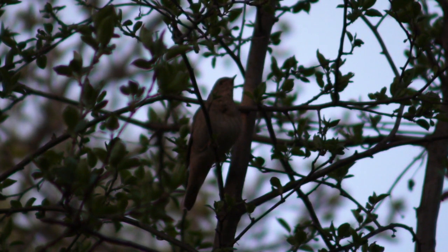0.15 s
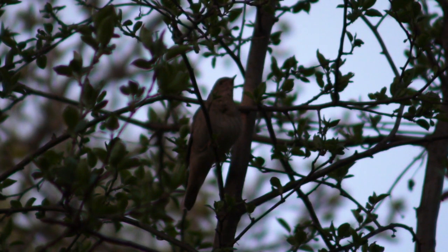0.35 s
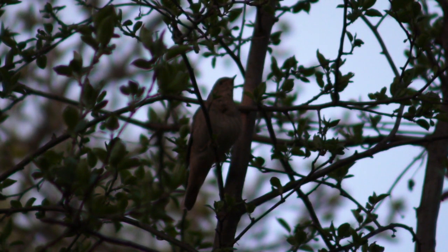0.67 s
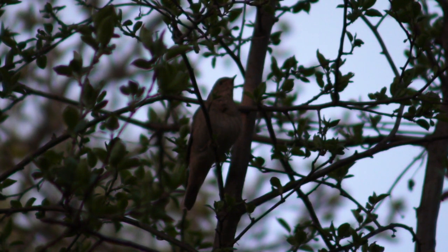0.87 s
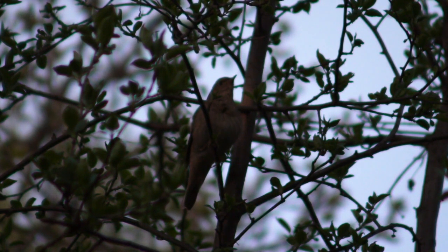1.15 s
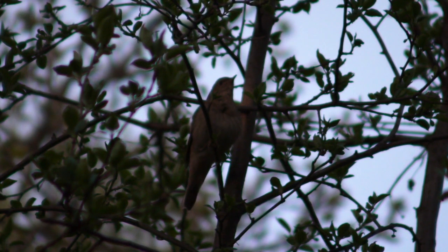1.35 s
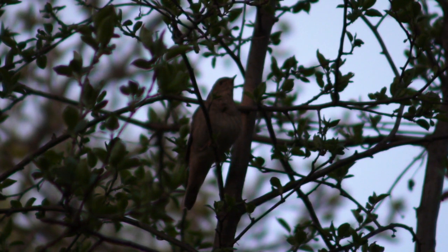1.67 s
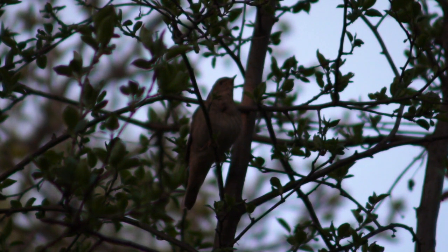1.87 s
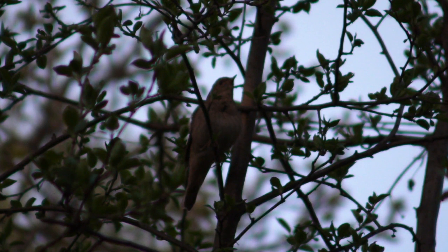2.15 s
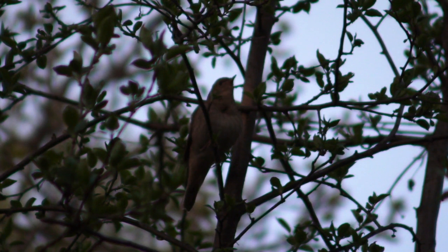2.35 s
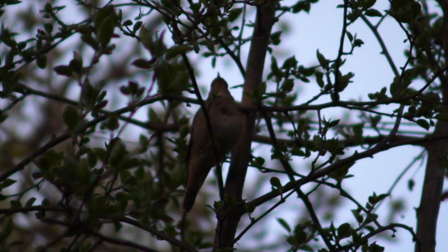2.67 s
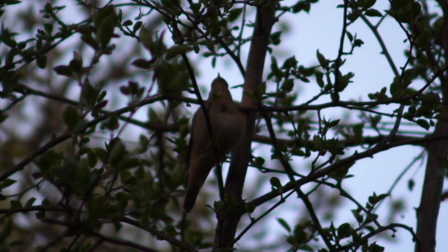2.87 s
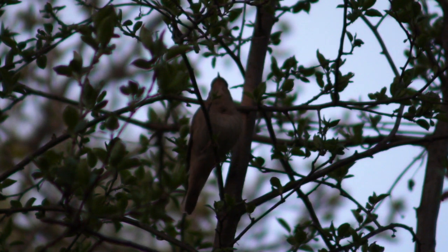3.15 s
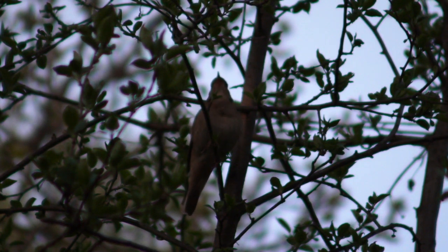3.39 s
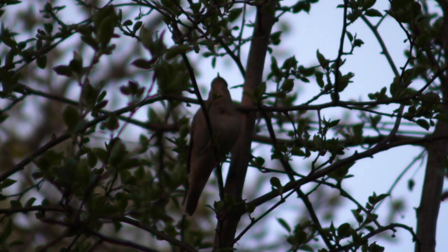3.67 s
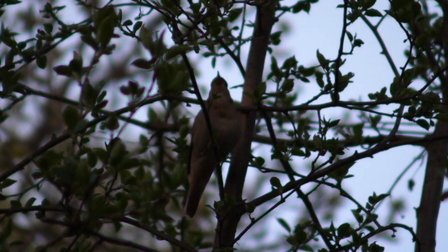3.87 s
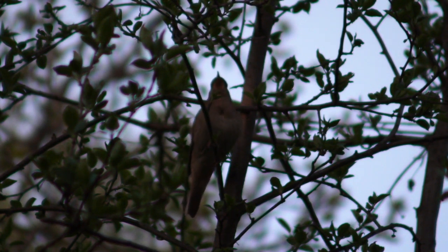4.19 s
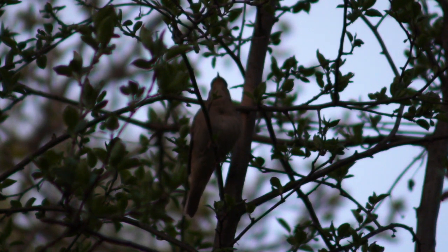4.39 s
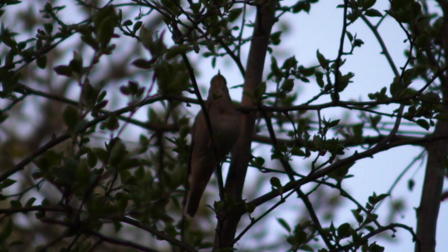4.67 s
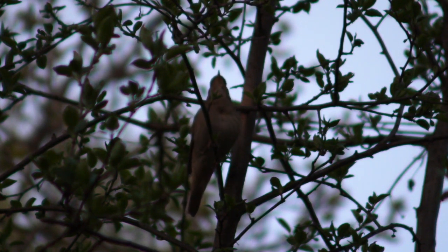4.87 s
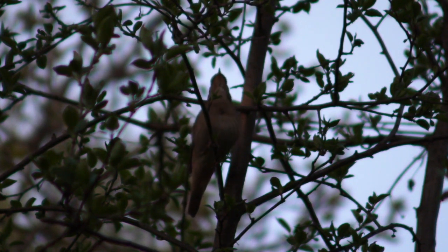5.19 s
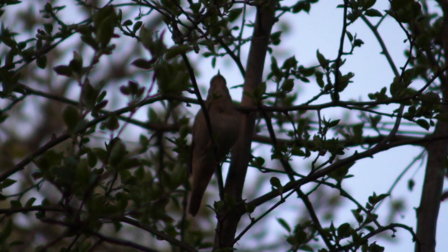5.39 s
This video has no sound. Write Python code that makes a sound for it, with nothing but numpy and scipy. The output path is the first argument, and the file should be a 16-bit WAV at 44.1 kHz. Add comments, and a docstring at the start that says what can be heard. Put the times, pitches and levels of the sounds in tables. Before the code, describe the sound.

A quiet opening of distant traffic roar, droning engines, tiny high chirps and faint rasping bursts. Then a close nightingale starts softly and swells into strong repeated phrases, alternating quick downward swoops with steady piercing whistles, later with buzzy low pairs of notes. Each note leaves a fluttering tail among trunks and twigs. Stereo outdoor pickup, with the background ducking slightly under the loudest song.

```python
"""Nightingale in a thicket

A nightingale sings from a branch a few metres away: falling swoops alternate with held whistles and low
double notes, all sines on pitch curves: the swoops with an octave, the others with more overtones.
Twigs and trunks scatter the song; far birds whistle and chirp, and noise bursts rasp far off. Town traffic
rumbles below as banded noise and engine drones. The recorder's limiter pulls everything down under the
loudest notes."""
import sys
import numpy as np
from scipy import signal
from scipy.fft import rfft, irfft, next_fast_len
from scipy.io import wavfile
from scipy.ndimage import uniform_filter1d

SR = 44100
rng = np.random.default_rng(int(sys.argv[2]) if len(sys.argv) > 2 else 0)


def put_to_file(sound):
    """Save the sound as 16-bit audio at rate SR, in the file named by the first command-line argument."""
    columns = np.atleast_2d(sound).T  # one column per channel
    safe = np.clip(columns, -1, 1)
    whole_steps = np.round(safe * 32767)
    wavfile.write(sys.argv[1], SR, whole_steps.astype(np.int16))


N = 244314   # samples


# Falling swoops, level before sag and scatter:
# (start [s], length [s], first pitch [Hz], top pitch [Hz], last pitch [Hz], level [dB], attack [s])
SWOOPS = [(2.409, 0.031, 5205, 5096, 3820, -15.5, 0.025), (3.039, 0.056, 4820, 7180, 3470, -11, 0.0064),
          (3.627, 0.066, 4385, 7070, 3060, -8, 0.0067), (4.287, 0.064, 4770, 7580, 2873, -6.5, 0.0036),
          (4.861, 0.067, 4820, 7580, 2767, -5, 0.0043), (5.41, 0.068, 4430, 7610, 2816, -6.5, 0.0034)]
# Held whistles: (start [s], length [s], first pitch [Hz], settled pitch [Hz], settled at [share],
# last pitch [Hz], first level [dB], full level [dB], full at [share], release [s], throb rate [1/s],
# first throb depth [dB], last throb depth [dB] (below 0 counts as 0), time of a throb crest [s])
WHISTLES = [(2.673, 0.199, 3407, 3220, .24, 3217, -20.5, -10, 0.66, 0.01, 23.2, 11.7, 0, 2.5),
            (3.305, 0.2092, 3424, 3142, 0.66, 3218, -20.5, -0.5, 0.77, 0.064, 45, 2.8, 5.5, 3.7),
            (3.893, .215, 3430, 3059, .53, 3145, -19, 0, 0.53, 0.057, 49.7, 2.9, 14.5, 4.017),
            (4.105, 0.13, 3150, 3114, 1, 3135, -18.5, -25, 0.78, 0.029, 46, 2, -5, 7.1)]
# Low notes, in pairs: (start [s], length [s], pitch [Hz], first level [dB], last level [dB],
# throb rate [1/s], time of a throb crest [s])
LOW_NOTES = [(4.573, 0.096, 1864, -24, -6.5, 37, 4.63), (4.692, 0.071, 1902, -5.5, -13.5, 27, 4.4),
             (5.131, 0.09, 1883, -17, -3, 39.5, 7.6), (5.237, 0.065, 1878, -24, -3, 42, 5.36)]
# Octave overtone of the swoops, best where the windpipe resonates
OCTAVE_DB, OCTAVE_HZ, OCTAVE_WIDTH_HZ = -15, 10480, 1170
WHISTLE_WAVER = 0.004   # share of the pitch


def nightingale():
    """Frequency modulation: each kind of note follows its own curves of pitch and level."""
    out = np.zeros(N)
    for row in SWOOPS:
        add_note(out, swoop(*row), 0.003, octave_db=OCTAVE_DB)
    for row in WHISTLES:
        add_note(out, whistle(*row), WHISTLE_WAVER, overtones=True)
    for row in LOW_NOTES:
        add_note(out, low_note(*row), WHISTLE_WAVER, overtones=True)
    return out


TOP_SHARE = 0.12    # share of a swoop spent moving to the top pitch
FALL_CURVE = 1.6    # power by which the fall steepens
SWOOP_SAG_DB, SWOOP_RELEASE_S = 2.5, 0.005


def swoop(start, length, first_hz, top_hz, last_hz, level_db, attack):
    """Pitch glide: a quick move to the top pitch, mostly upward, then an ever steeper fall.

    Rows are (time [s], pitch [Hz], level [dB])."""
    share = np.linspace(0, 1, 100)
    to_top = np.interp(share, [0, TOP_SHARE], [first_hz, top_hz])
    fall = np.clip((share - TOP_SHARE) / (1 - TOP_SHARE), 0, 1) ** FALL_CURVE
    hz = to_top - (top_hz - last_hz) * fall
    level_db = level_db - SWOOP_SAG_DB * share + soft_edges(share * length, attack, SWOOP_RELEASE_S)
    return np.transpose([start + share * length, hz, level_db])


SETTLE_CURVE, WHISTLE_ATTACK_S = 1.2, 0.024
LIFT_S = 0.067   # time to move from the settled pitch to the last


def whistle(start, length, first_hz, settled_hz, settled_at, last_hz, first_db, full_db, full_at,
            release, per_s, early_db, late_db, crest):
    """Amplitude modulation: a tone slides to settle, shifts a little, and throbs as its level moves to full."""
    share = np.linspace(0, 1, 200)
    s = start + share * length
    settle = np.clip(1 - share / settled_at, 0, 1) ** SETTLE_CURVE
    lift = np.clip((share - settled_at) * length / LIFT_S, 0, 1)
    hz = settled_hz + settle * (first_hz - settled_hz) + lift * (last_hz - settled_hz)
    level_db = np.interp(share, [0, full_at], [first_db, full_db])
    level_db = level_db + soft_edges(s - start, WHISTLE_ATTACK_S, release)
    depth_db = np.maximum(early_db + (late_db - early_db) * share, 0)
    return np.transpose([s, hz, level_db + throb(s, per_s, depth_db, crest)])


DROOP_SHARE, DROOP_CURVE = 0.08, 4   # share of the pitch lost, and the power that makes it droop late
LOW_ATTACK_S, LOW_RELEASE_S = 0.018, 0.013
LOW_THROB_DB = 8


def low_note(start, length, hz, first_db, last_db, per_s, crest):
    """Amplitude modulation: a throbbing tone holds its pitch, then droops."""
    share = np.linspace(0, 1, 100)
    s = start + share * length
    level_db = first_db + (last_db - first_db) * share
    level_db = level_db + soft_edges(s - start, LOW_ATTACK_S, LOW_RELEASE_S)
    level_db = level_db + throb(s, per_s, LOW_THROB_DB, crest)
    return np.transpose([s, hz * (1 - DROOP_SHARE * share ** DROOP_CURVE), level_db])


def throb(s, per_s, depth_db, crest):
    """Periodic amplitude modulation in dB: round crests with narrow dips between them."""
    return -depth_db * np.sin(np.pi * per_s * (s - crest)) ** 4


SOFT_DB = -27   # attacks start and releases end this far down


def soft_edges(t, attack, release):
    """Envelope of onset and decay: level in dB rises over the attack and falls over the release."""
    rising = np.clip(1 - t / attack, 0, 1) ** 2
    falling = np.clip(1 - (t[-1] - t) / release, 0, 1) ** 2
    return SOFT_DB * (rising + falling)


# Overtones that pass the windpipe and beak: (frequency [Hz], level against the fundamental [dB])
OVERTONES = [(3500, -31.5), (5500, -43), (6400, -36), (8000, -48.5), (9500, -41), (11000, -28),
             (13000, -57.5), (15000, -46)]
LOW_NOTE_BUZZ_DB = -0.5   # added to the overtones of notes that start below 2500 Hz
FLUTTER_DB = 1.05         # quick random level flutter of the whistles and low notes


def add_note(out, rows, waver, overtones=False, octave_db=-99):
    """Additive synthesis: a sine on a wavering pitch curve, with filtered harmonics and soft ends."""
    s, hz, level_db = np.transpose(rows)
    at = np.arange(int(s[0] * SR), min(int(s[-1] * SR), N))
    size = len(at)
    pitch = uniform_filter1d(np.interp(at / SR, s, hz), size=size // 25 + 1, mode="nearest")
    pitch = pitch * (1 + waver * drift(17, size))
    phase = 2 * np.pi * (np.cumsum(pitch) / SR + rng.random())
    flutter_db = overtones * FLUTTER_DB * drift(110, size)
    soft_ends = np.clip(np.minimum(at - at[0], at[-1] - at) / 60, 0, 1)
    # The square root of 2 makes the table levels rms levels
    level = np.sqrt(2) * from_db(np.interp(at / SR, s, level_db) + flutter_db) * soft_ends
    resonance = 1 / (1 + ((2 * pitch - OCTAVE_HZ) / OCTAVE_WIDTH_HZ) ** 2)
    tone = level * (np.sin(phase) + from_db(octave_db) * resonance * np.sin(2 * phase))
    effort = uniform_filter1d(level, size=900, mode="constant")   # overtones do not follow the quick throbs
    for k in range(2, 9 if overtones else 2):
        flicker = from_db(3.05 * drift(100, size) + LOW_NOTE_BUZZ_DB * (hz[0] < 2500))
        passed = (k * pitch < 16000) * from_db(at_hz(OVERTONES, k * pitch))
        tone += effort * passed * flicker * np.sin(k * phase)
    out[at] += tone


SWOOP_AIR_DB = -34   # rush of air against the tone of a swoop


def swoop_air():
    """Turbulence noise: a wide band of noise under the envelope of each swoop."""
    t, blow = np.arange(N) / SR, 0
    for row in SWOOPS:
        s, hz, level_db = swoop(*row).T
        blow = blow + np.interp(t, s, from_db(level_db), left=0, right=0)
    band = signal.butter(3, [3500, 14000], "band", fs=SR, output="sos")
    bright = signal.sosfilt(band, rng.standard_normal(N))
    return from_db(SWOOP_AIR_DB) * blow * rms_one(bright)


# Nearest reflections, one list for left and one for right: (lag [ms], level [dB])
ECHOES = [
    [(3.7, -21), (5.9, -23), (6.6, -8.5), (7.8, -6.5), (12.2, -13.5)],
    [(2.5, -13), (5.4, -18.5), (6.4, -13), (8.3, -10), (10.9, -9.5)],
]
# Side of the singer as the microphone ports hear it: (frequency [Hz], left minus right [dB])
SINGER_PAN = [(1800, 6.5), (3200, 3), (5000, -6.5), (6800, -7), (11000, -5)]
# Scatter from foliage: (frequency [Hz], time to decay by 60 dB [s], relative level [dB])
FOLIAGE = [(1480, 1, -5.5), (3000, 1, -9), (4770, 0.93, -1.5), (7370, 0.63, -2.5), (11800, 0.18, -1)]
# Dense early scatter, its level against the start of the long tail
NEAR_TWIGS_T60_S, NEAR_TWIGS_DB = 0.15, 19.5


def thicket(x, direct_db, scatter_db):
    """Multiple scattering: direct sound, near reflections and a noisy tail whose top treble dies fastest."""
    size = next_fast_len(N + SR)
    hz, t = np.fft.rfftfreq(size, 1 / SR) + 1, np.arange(SR) / SR   # 1 Hz up, so the log stays finite
    source = rfft(x, size)
    log_centres = np.log(np.array(FOLIAGE)[:, 0])
    out = []
    for side, echoes in zip((1, -1), ECHOES):
        near = 1 + sum(from_db(db) * np.exp(-2j * np.pi * hz * ms / 1000) for ms, db in echoes)
        near = near * from_db(direct_db + side * at_hz(SINGER_PAN, hz) / 2)
        noise = rng.standard_normal(SR) * np.clip(t / 0.016, 0, 1)   # each channel has its own
        tail = 0
        for k, (centre, t60, level_db) in enumerate(FOLIAGE):
            decay = from_db(-60 * t / t60) + from_db(NEAR_TWIGS_DB - 60 * t / NEAR_TWIGS_T60_S)
            dying = noise * decay
            weight = np.interp(np.log(hz), log_centres, np.arange(len(FOLIAGE)) == k)
            response = rfft(dying / np.linalg.norm(dying), size)
            tail = tail + weight * from_db(level_db + scatter_db) * response
        stirring = from_db(1.5 * drift(25, N))   # moving leaves make the tail flutter
        direct = irfft(source * near, size)[:N]
        scattered = irfft(source * tail, size)[:N]
        out.append(direct + stirring * scattered)
    return np.array(out)


# A far songbird, level before scatter: (start [s], length [s], first pitch [Hz], last pitch [Hz],
# loudest at [share], peak level [dB])
FAR_SONG = [(1.575, .3, 2175, 1928, 1, -53.5), (1.96, .07, 2410, 2064, 0.26, -45.5),
            (2.08, 0.17, 1860, 1770, 0.24, -50), (2.17, 0.28, 1991, 1995, 0.29, -46),
            (2.596, .08, 3850, 3260, 0.78, -53.5), (2.86, 0.19, 3445, 3506, 0.13, -44.5)]
FAR_SWELL_DB = 13


def far_songbird():
    """Diffuse field: gliding whistles arrive mostly as scatter."""
    out = np.zeros(N)
    for note in FAR_SONG:
        add_note(out, glide(*note, FAR_SWELL_DB), 0.003)
    return thicket(out, direct_db=1.5, scatter_db=17.0)


def glide(start, length, first_hz, last_hz, loudest_at, peak_db, swell_db):
    """Linear pitch glide: swells to its peak and fades as far again."""
    peak_hz = first_hz + loudest_at * (last_hz - first_hz)
    return [(start, first_hz, peak_db - swell_db),
            (start + loudest_at * length, peak_hz, peak_db),
            (start + length, last_hz, peak_db - swell_db)]


# Thin two-tone chirps far off, levels before panning and uneven fading:
# (start [s], upper tone peak [dB], upper tone [Hz], lower tone peak [dB])
CHIRPS = [(0.0515, -47, 6510, -52), (0.3303, -54.5, 6400, -55), (0.748, -53.5, 6380, -58),
          (1.042, -56, 6400, -56.5), (1.1199, -48, 6550, -53), (1.2306, -52, 6280, -60),
          (1.3662, -46.5, 6480, -51), (1.501, -66, 6550, -60), (1.602, -45.5, 6500, -55),
          (2.343, -56, 6360, -53), (2.5056, -56, 6220, -66), (2.7107, -56, 6380, -56),
          (2.9407, -51, 6300, -53)]
CHIRP_T60_S = 0.51
LOWER_TONE_HZ, CHIRP_PAN_DB = 4236, -10   # pan is left minus right


def chirps():
    """Exponential decay: two tones flick up, then fade unevenly."""
    out, t = np.zeros((2, N)), np.arange(SR // 4) / SR
    pan = from_db([[CHIRP_PAN_DB / 2], [-CHIRP_PAN_DB / 2]])
    for s, upper_db, hz, lower_db in CHIRPS:
        at = int(s * SR)
        pitch = hz * (1 - 0.036 * np.exp(-t / 0.004) + 0.0048 * drift(80, len(t)))
        fade = from_db(-60 * t / CHIRP_T60_S + 3.4 * drift(64, len(t))) * np.clip(t / 0.001, 0, 1)
        phase = 2 * np.pi * np.cumsum(pitch) / SR
        upper = from_db(upper_db) * np.sin(phase)
        lower = from_db(lower_db) * np.sin(phase * LOWER_TONE_HZ / hz)
        out[:, at:at + len(t)] += fade * (upper + lower) * pan
    return out


# Rasps far off: (start [s], level [dB], low edge [Hz], high edge [Hz], rise [s], fade [dB/s])
RASPS = [(0.249, -52, 1600, 3620, 0.0071, 200), (.05, -47.5, 3470, 6140, 0.011, 100),
         (1.36, -47.5, 3700, 5300, .02, 130), (1.6, -50, 3000, 6040, .02, 150),
         (1.88, -41, 2150, 2760, 0.037, 150), (1.96, -38, 1870, 2660, 0.017, 102),
         (2.6, -41, 1775, 2150, 0.073, 111.5)]


def rasps():
    """Band-limited noise: grainy bursts swell and die away, with independent noise in each channel."""
    out, t = np.zeros((2, N)), np.arange(SR // 3) / SR
    for s, level_db, low_hz, high_hz, rise, fade_db in RASPS:
        at = int(s * SR)
        band = signal.butter(4, [low_hz, high_hz], "band", fs=SR, output="sos")
        noise = signal.sosfilt(band, rng.standard_normal((2, len(t))))
        fading_db = level_db - fade_db * np.maximum(t - rise, 0)
        grain_db = 0.77 * drift(60, len(t))
        shape = np.clip(t / rise, 0, 1) * from_db(fading_db + grain_db)
        out[:, at:at + len(t)] += shape * rms_one(noise)
    return out


# Traffic level over time: (time [s], deep rumble [dB], roar [dB])
TRAFFIC = [(0.0, -33.5, -36), (.9, -35.5, -38), (1.7, -37, -37), (2.8, -36.5, -37), (3.5, -34.5, -37),
           (4.4, -36.5, -35), (4.85, -35, -35.5), (5.2, -34.5, -36), (5.54, -32.5, -35.5)]
# Spectrum of the rumble: (frequency [Hz], relative density [dB per Hz])
RUMBLE = [(12, -49), (20, -37.5), (40, -6), (59, 7.5), (87, -4), (118, 1), (178, -13), (250, -2),
          (320, -59), (550, -120)]
# Spectrum of the roar: (frequency [Hz], relative density [dB per Hz])
ROAR = [(71, -60), (120, -19), (166, -30.5), (272, -11.5), (315, -19), (365, -11), (738, -15.5),
        (1060, -14), (1730, -25.5), (2400, -31), (6000, -43.5), (7800, -78.5), (13200, -120)]
# Two engines changing speed, a list for each: (time [s], pitch [Hz], level [dB])
ENGINES = [
    [(0, 103.9, -37), (.3, 104.8, -36), (.82, 113.1, -43), (1.0, 114.9, -40.5), (1.6, 118.5, -37.5),
     (1.74, 121.8, -50), (1.86, 122.8, -40.5), (3.15, 127.3, -38.5), (3.25, 127, -62)],
    [(3.45, 55.8, -47), (3.6, 53.35, -37), (4.5, 58.7, -28), (5.0, 56.4, -43.5), (5.54, 62, -31)],
]
# Fainter drones: (start [s], length [s], first pitch [Hz], last pitch [Hz], loudest at [share], peak [dB])
DRONES = [(0.76, 1.38, 72.5, 70.5, 0.99, -34), (3.9, 1.5, 150, 147, 0.44, -42),
          (3.0, 2.3, 227, 228, 0.5, -48), (0.36, 1.3, 390, 432, .5, -44), (2.7, 1.7, 386, 456, .6, -42.5)]
DRONE_SWELL_DB = 8
BASS_LAG_S = 0.00018


def traffic():
    """Interaural delay: rumble, roar and drones come from the right and reach the left port late."""
    s, rumble_db, roar_db = np.transpose(TRAFFIC)
    t = np.arange(N) / SR
    out = from_db(np.interp(t, s, rumble_db)) * banded_noise(RUMBLE, patchy_db=2.5)
    out += from_db(np.interp(t, s, roar_db)) * banded_noise(ROAR, patchy_db=0.62)
    drones = np.zeros(N)
    for drone in ENGINES + [glide(*row, DRONE_SWELL_DB) for row in DRONES]:
        add_note(drones, drone, 0.01)
    out += drones
    out[0] = np.roll(out[0], round(BASS_LAG_S * SR))
    return out


# Likeness of the two channels: (frequency [Hz], left-right correlation [-1 to 1])
LIKENESS = [(60, 0.98), (150, 0.96), (380, 0.95), (950, 1), (2380, 0.033), (5980, 0.11), (15000, 0.91)]


def banded_noise(spectrum, patchy_db):
    """Subtractive synthesis: half-octave noise bands, each with its level, slow swell and likeness; rms 1."""
    out, band_edges = 0, 20 * 2 ** np.arange(0, 10, 0.5)
    white = rng.standard_normal((2, 2, N))   # neighbouring bands take different noise
    for k, (low, high) in enumerate(zip(band_edges, band_edges[1:])):
        hz = np.sqrt(low * high)
        if spectrum[0][0] < hz < spectrum[-1][0] * 1.2:
            band = signal.butter(2, [low, high], "band", fs=SR, output="sos")
            mid, side = signal.sosfilt(band, white[k % 2])
            alike = np.clip(at_hz(LIKENESS, hz), -1, 1)
            gain = from_db(at_hz(spectrum, hz) + patchy_db * drift(6.8, N))
            out = out + gain * (np.sqrt(1 + alike) * mid + np.sqrt(1 - alike) * side * [[1], [-1]])
    return rms_one(out)


def from_db(db):
    """Logarithmic level: decibels to amplitude gain."""
    return 10 ** (np.asarray(db) / 20)


def rms_one(x):
    """Effective value: scales a signal to rms 1."""
    return x / np.sqrt(np.mean(x ** 2) + 1e-20)


def at_hz(points, hz, column=1):
    """Logarithmic frequency: reads a table between its points on a log axis."""
    return np.interp(np.log(hz), np.log(np.array(points)[:, 0]), np.array(points)[:, column])


def drift(rate, size):
    """Low-pass noise: random drift of rms 1, slower for a lower rate in Hz."""
    r = np.exp(-2 * np.pi * rate / SR)
    slow = signal.lfilter([1], [1, -2 * r, r * r], rng.standard_normal(size + SR // 4))
    return rms_one(slow[SR // 4:])   # the filter's start-up is dropped


HISS_DB = -55   # microphone noise


def scene():
    """Superposition: all sources add at the microphone, over its own hiss."""
    near = thicket(nightingale() + swoop_air(), direct_db=-1.5, scatter_db=-1.5)
    hiss = from_db(HISS_DB) * rng.standard_normal((2, N))
    return near + far_songbird() + chirps() + rasps() + traffic() + hiss


BASS_CUT_HZ, CUTOFF_HZ = 48, 16500   # microphone roll-off, and where the treble is fully cut
LIMIT_DB, RELEASE_DB_PER_S, ATTACK_S = -4, 108.5, 0.003


def record(dry):
    """Peak limiting: the deepest bass is lost, a limiter holds the peaks and lets go slowly; the top is cut."""
    dry = signal.sosfilt(signal.butter(2, BASS_CUT_HZ, "high", fs=SR, output="sos"), dry)
    over_db = np.maximum(20 * np.log10(np.abs(dry).max(axis=0) + 1e-9) - LIMIT_DB, 0)
    ramp = RELEASE_DB_PER_S * np.arange(N) / SR
    held_db = np.maximum(np.maximum.accumulate(over_db + ramp) - ramp, 0)
    r = np.exp(-1 / (ATTACK_S * SR))
    cut_db = signal.lfilter([1 - r], [1, -r], held_db)
    ahead = round(ATTACK_S * SR)   # the limiter looks ahead by its attack time
    early_cut_db = np.append(cut_db[ahead:], np.full(ahead, cut_db[-1]))
    limited = dry * from_db(-early_cut_db)
    return signal.sosfilt(signal.cheby2(12, 70, CUTOFF_HZ, fs=SR, output="sos"), limited)


dry = scene()
out = record(dry)
put_to_file(out)
```